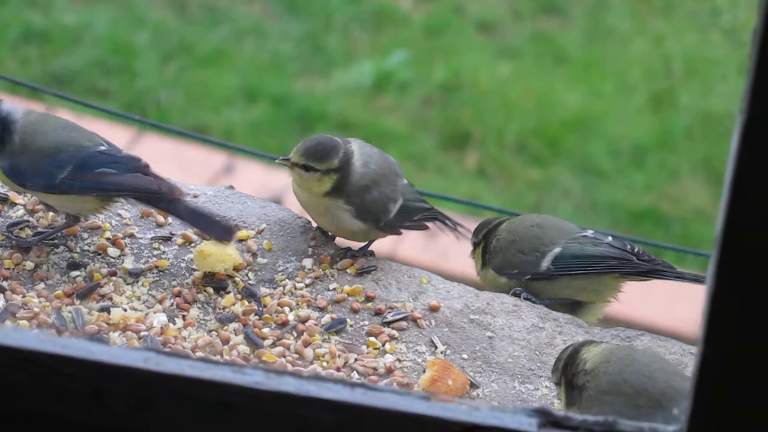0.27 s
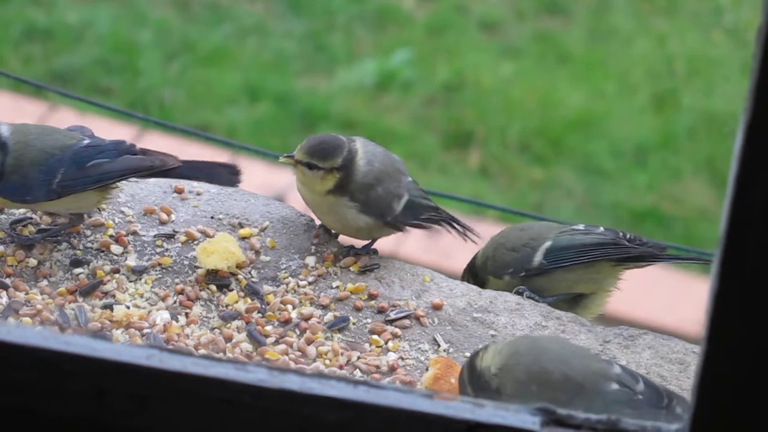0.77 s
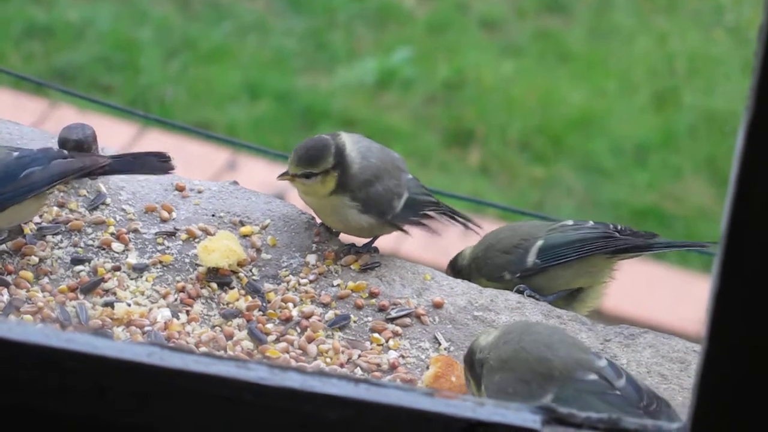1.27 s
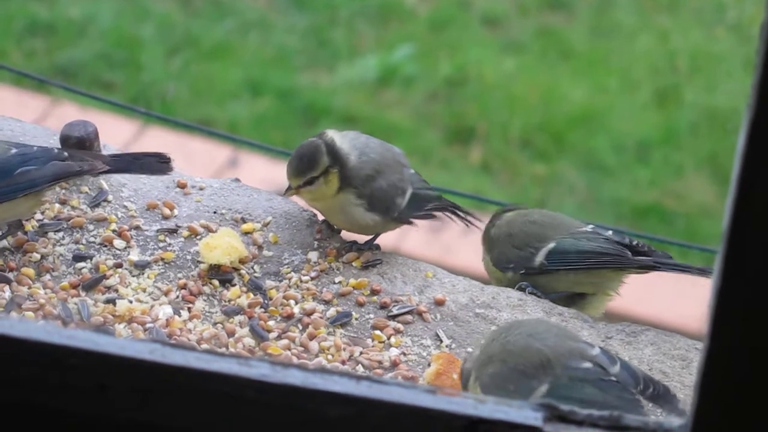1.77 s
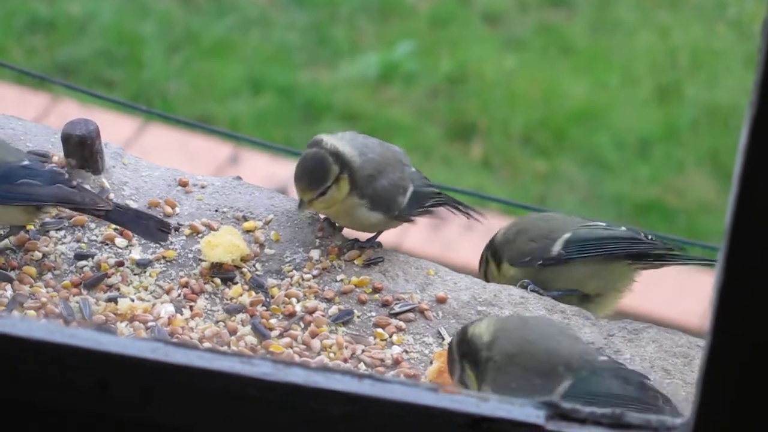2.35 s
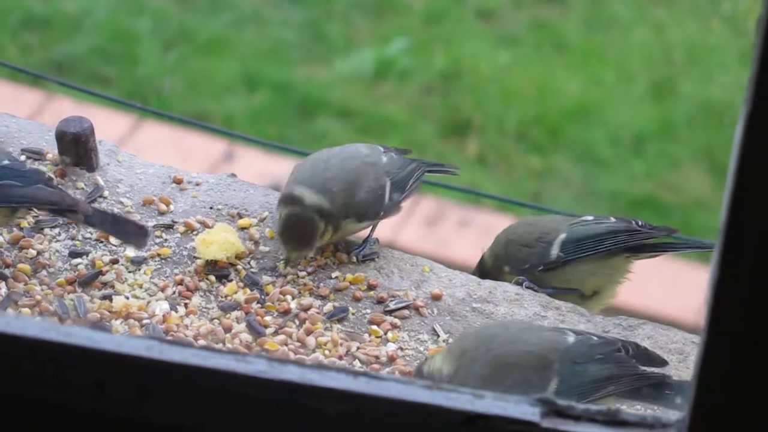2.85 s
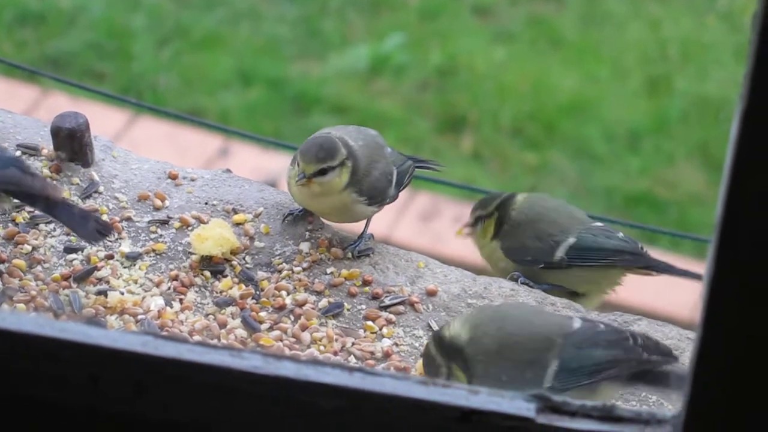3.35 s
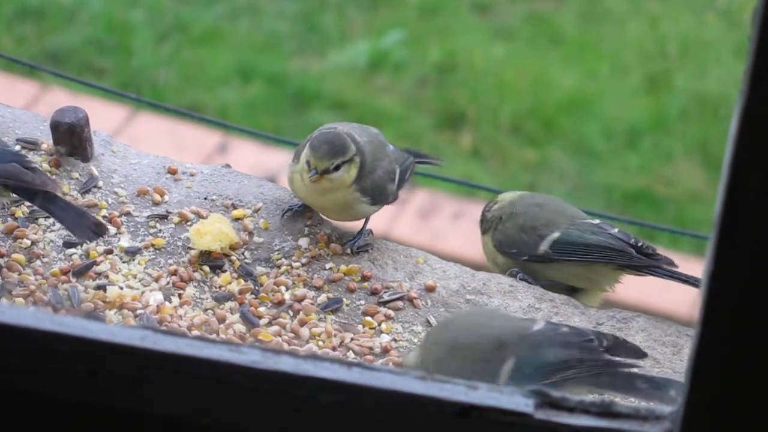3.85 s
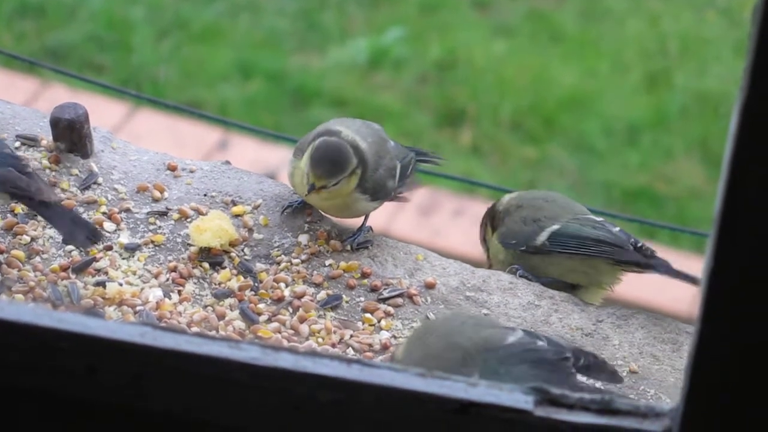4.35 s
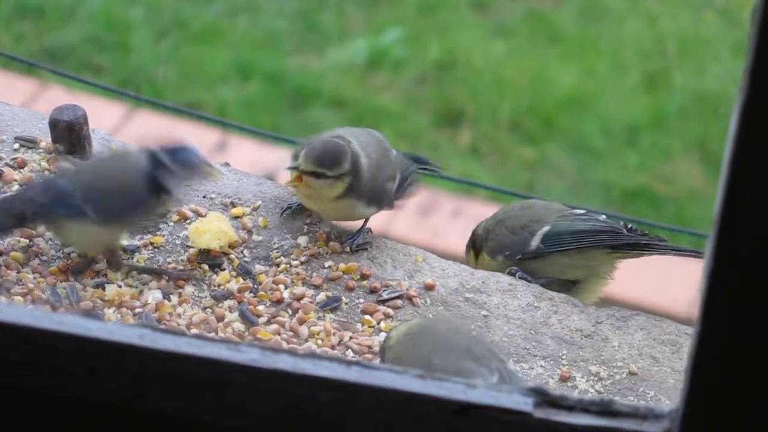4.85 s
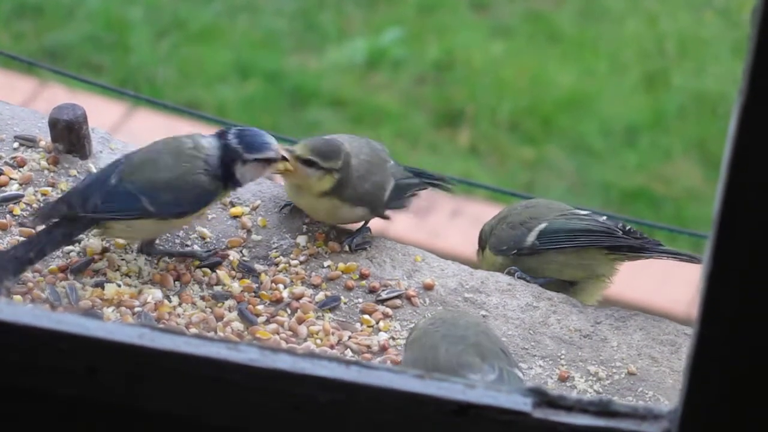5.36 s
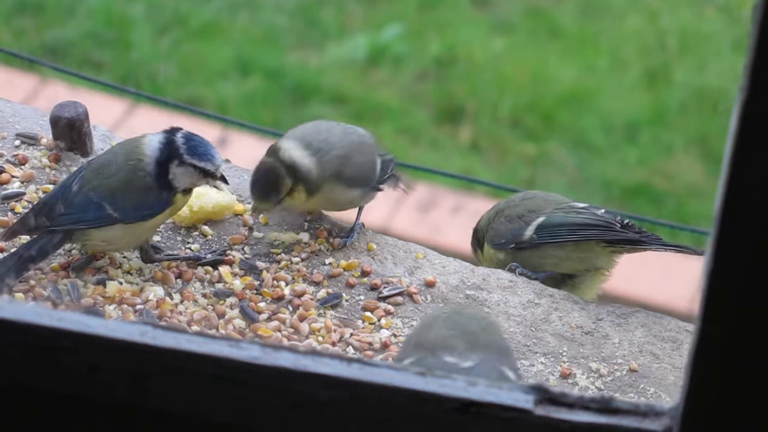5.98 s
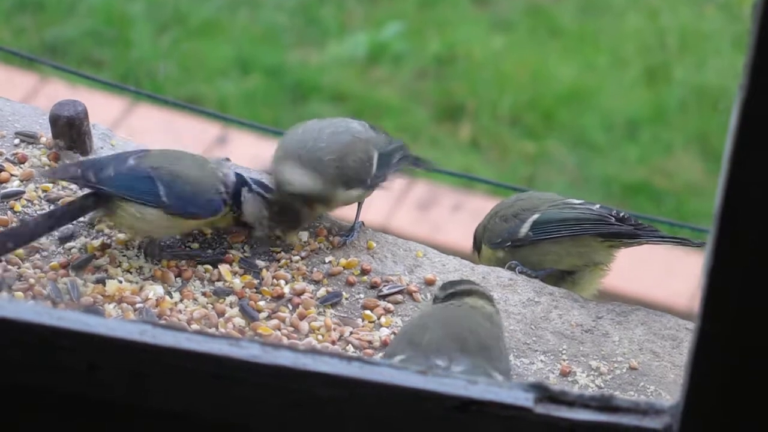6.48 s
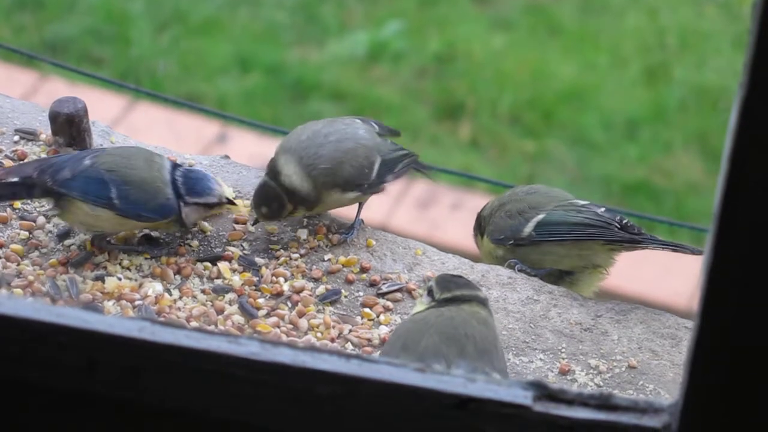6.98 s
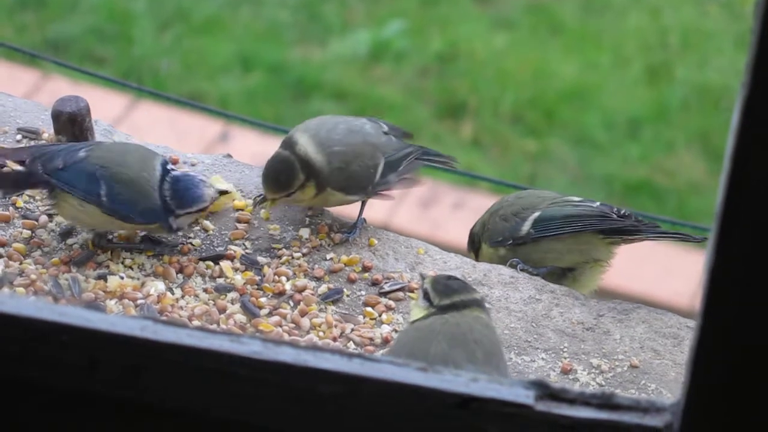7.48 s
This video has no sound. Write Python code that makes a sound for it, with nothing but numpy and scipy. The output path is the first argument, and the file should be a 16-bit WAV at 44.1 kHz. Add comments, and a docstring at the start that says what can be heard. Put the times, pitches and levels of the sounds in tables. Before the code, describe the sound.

Heard in stereo from just inside a window, young birds give rapid begging calls: rasping, climbing chirps around the middle treble and piercing peeps that sag in pitch. After the first clusters they nearly hush while a second bird sings a brief sweet whistle to the left. Louder mixed rasps and peeps follow to the end, lightly echoing off the recess, with a faint hush and barely audible low drone.

```python
"""Begging fledglings at a window

Blue tit fledglings beg at a window sill, heard from just inside: hoarse rasps come from two unsteady voices,
thin peeps start with a scratch and lock into a tone. Another small bird whistles one phrase of gliding notes.
Delayed copies and a fading noise tail echo the birds; filtered noise makes a faint outdoor hush and a low drone."""
import sys
import numpy as np
from scipy import signal
from scipy.fft import rfft, irfft, next_fast_len
from scipy.io import wavfile
from scipy.ndimage import map_coordinates

SR = 44100
rng = np.random.default_rng(int(sys.argv[2]) if len(sys.argv) > 2 else 0)


def generate_wav(signal):
    """Clip the signal to [-1, 1] and save it as 16-bit WAV at the path in sys.argv[1]."""
    frames = np.transpose(np.atleast_2d(signal))
    scaled = np.clip(frames, -1, 1) * 32767
    pcm = np.round(scaled).astype(np.int16)
    wavfile.write(sys.argv[1], SR, pcm)


N = 340893  # length of the scene in samples


def gain_of(db):
    """Turns decibels into amplitude."""
    return 10 ** (np.asarray(db) / 20)


def evened(x):
    """Scales a sound to an rms of 1."""
    return x / np.sqrt(np.mean(x ** 2) + 1e-20)


def read(points, hz):
    """Reads a table between its points, along a logarithmic frequency axis."""
    f, value = np.transpose(points)
    return np.interp(np.log(hz + 1), np.log(f + 1), value)


def add(mix, s, sound):
    """Adds a sound into the mix at time s in seconds, cutting off what lies outside."""
    start = round(s * SR)
    sound = sound[..., max(-start, 0):]
    part = mix[..., max(start, 0):][..., :sound.shape[-1]]
    part += sound[..., :part.shape[-1]]


def colour(x, db_at):
    """Filters a sound by a gain in dB given as a function of frequency."""
    size = next_fast_len(x.shape[-1] + 512)
    gains = gain_of(db_at(np.fft.rfftfreq(size, 1 / SR)))
    return irfft(rfft(x, size) * gains, size)[..., :x.shape[-1]]


def wander(t, hz):
    """Smooth random curve of rms 1 that takes hz new values a second."""
    return evened(map_coordinates(rng.standard_normal(1024), [t * hz], order=3, mode="wrap"))


def gate(t, length, rise, fall):
    """Opens and closes a sound softly; all times in seconds."""
    opening = np.sin(np.pi / 2 * np.clip(t / rise, 0, 1)) ** 2
    closing = np.sin(np.pi / 2 * np.clip((length - t) / fall, 0, 1)) ** 2
    return opening * closing


def panned(x, side_db):
    """Places a sound between left and right at constant power; positive side_db is left."""
    gains = gain_of(np.array([[side_db], [-side_db]]) / 2)
    return evened(gains) * x


def delayed(x, seconds):
    """Delays a sound by a fraction of a millisecond, by turning the phase of each frequency."""
    turn = np.exp(-2j * np.pi * np.fft.rfftfreq(2 * N, 1 / SR) * seconds)
    return irfft(rfft(x, 2 * N) * turn)[:N]


def hoarse(t, hz, rough, bright_db):
    """The two sides of the syrinx sing a small interval apart and pull on each other, splitting every harmonic."""
    # How the throat and open beak shape the voice.
    # Each row: frequency in Hz, gain in dB.
    throat = [(500, -34), (1100, -21), (1900, -14), (2700, -15), (3500, -8), (4100, -0.5), (4800, 6),
              (5500, 5), (6100, 1.5), (6900, 5.5), (7800, -6), (9500, -11.5), (11500, -22), (13000, -33.5),
              (15500, -41.5)]
    interval = 1.19  # pitch of the high side as a multiple of the low side

    def side_phase(side_hz):
        unsteady = 0.02454 * wander(t, 1502) + 0.021 * wander(t, 151.1)
        return 2 * np.pi * np.cumsum(side_hz * (1 + rough * unsteady)) / SR

    low, high = side_phase(hz), side_phase(interval * hz)
    pull = rough * np.sin(high - low)
    share = np.clip(2 * rough - .5, 0, 1)  # the high side is weaker in the cleaner calls
    stack = 0
    for k in range(1, 6):
        strength = 0.8 if k == 1 else 1
        stack = stack + strength * (np.cos(k * low + pull) + share * np.cos(k * high - pull))
    # strong and weak cycles alternate at times
    stack = stack * (1 + 0.37 * rough * wander(t, 199) * np.cos(low / 2))
    pressure = np.exp(rough * (0.5 * wander(t, 1400) + 0.16 * wander(t, 260)))
    breath = rough * rng.standard_normal(SR)[:len(t)]
    drive = pressure * (evened(stack) + breath)
    # bright_db tilts the sound by that many dB per octave
    return evened(colour(drive, lambda f: read(throat, f) + bright_db * np.log2(np.clip(f, 2200, 9000) / 5000)))


def rasp(length, level_db, top_hz, rough, bright_db):
    """A hoarse call that climbs to its top pitch; farther climbs are steeper, and the opening beak frees the voice."""
    onset_hz, onset_share = 1750, .42  # the pitch starts about this share of the way from onset_hz to the top
    crest = .82  # the top pitch comes after this share of the call
    push_s, droop_db_per_s = .052, 55  # effort peaks at push_s and droops on either side
    opening_s = 0.031
    t = np.arange(0, length + 0.01577, 1 / SR)
    climb_hz = (1 - onset_share) * abs(top_hz - onset_hz)
    hz = top_hz - climb_hz * (1 - t / t[-1] / crest) ** 2
    level = gain_of(level_db - droop_db_per_s * abs(t - push_s))
    voice = hoarse(t, hz, rough, bright_db)
    # a beak still partly shut lets mostly its own resonance through
    shut = evened(colour(voice, lambda f: -np.minimum(abs(f - 4750) / 180, 14)))
    opened = np.clip(t / opening_s, 0, 1)
    return level * gate(t, t[-1], rise=0.031, fall=0.031) * evened(opened * voice + (1 - opened) * shut)


def scratch(length, level_db, top_hz):
    """The rough start of a peep: a hoarse band that swells and climbs until the syrinx locks into a tone."""
    band_hz = 1100  # how fast the noise of the climbing band changes
    t = np.arange(0, length + 0.01304, 1 / SR)
    hz = np.interp(t, [0, .6 * length, t[-1]], [2050, 2300, .45 * top_hz])
    phase = 2 * np.pi * np.cumsum(2 * hz) / SR  # the noise band lies an octave above the hoarse pitch
    climbing = wander(t, band_hz) * np.cos(phase) + wander(t, band_hz) * np.sin(phase)
    bright_db = 10 * np.log2(top_hz / 7400)  # higher peeps start with a brighter scratch
    voice = climbing + gain_of(2) * hoarse(t, hz, rough=0.93, bright_db=bright_db)
    # thin out below the beak's resonance, by 5 dB per octave
    voice = colour(voice, lambda f: 5 * np.log2(np.clip(f, 500, 3500) / 3500))
    return gain_of(level_db) * gate(t, t[-1], rise=0.03, fall=0.019) * evened(voice)


def tone(lead, length, level_db, start_hz, end_hz, harmonic, upper_db):
    """A quick upward sweep, then a clear sagging tone: the throat picks one harmonic of a low stack."""
    sweep, release = .02, .007  # seconds
    muffle_hz, muffle_db_per_hz = 4800, .011  # the throat muffles whatever lies below this pitch
    t = np.arange(0, lead + length + release, 1 / SR)
    rising = np.clip((lead - t) / sweep, 0, 1)  # falls from 1 to 0 during the sweep
    held = np.maximum(t - lead, 0) / length  # grows from 0 to 1 during the tone
    hz = (start_hz + (end_hz - start_hz) * held ** 2) * (1 - .42 * rising ** 1.5)
    hz *= 1 + (.0025 + .045 * rising) * wander(t, 1100) + .002 * wander(t, 130)
    phase = 2 * np.pi * np.cumsum(hz / harmonic) / SR
    # the carrying harmonic, three neighbours and its octave: (steps up the stack, dB)
    partials = [(-1, -3 - 5.3 * harmonic), (0, 0), (1, upper_db), (2, upper_db - 110 / harmonic), (harmonic, -41)]
    voice = 0
    for step, db in partials:
        below_hz = np.maximum(muffle_hz - hz * (1 + step / harmonic), 0)
        voice = voice + gain_of(db - muffle_db_per_hz * below_hz) * np.cos((harmonic + step) * phase)
    quiver_db = 1.4 * wander(t, 140)
    effort_db = level_db - 13 * rising + 3.5 * (held - .5) + quiver_db
    opening = gate(t - lead + sweep, length + sweep + release, rise=.008, fall=.009)
    return np.sqrt(2) * gain_of(effort_db) * voice * opening


def peep(length, scratch_db, tone_db, start_hz, end_hz, harmonic, upper_db):
    """A scratch that locks into a tone; returns the sound and how many seconds before the lock it starts."""
    scratch_s, early = .03, .005  # the scratch starts this much earlier than the tone's lead-in
    out = np.zeros(SR // 4)
    add(out, 0, scratch(scratch_s, scratch_db, start_hz))
    add(out, early, tone(scratch_s, length, tone_db, start_hz, end_hz, harmonic, upper_db))
    return out, scratch_s + early


def fledglings():
    """Rasps and peeps from the sill; two microphones colour them differently and hear them at different times."""
    # Hoarse begging calls.
    # Each row: time in seconds, nominal length in seconds, level in dB at greatest effort, top pitch in Hz,
    # roughness from 0 clean to about 1 harsh, brightness in dB per octave.
    rasp_calls = [(.175, .075, -49.5, 1720, .45, -14), (.732, .06, -29.5, 2370, .65, -5),
                  (.846, .065, -30, 2700, .6, 0), (.99, .06, -39.5, 2300, .85, -7),
                  (1.143, .11, -31.5, 3030, .7, 0), (1.634, .07, -32, 2370, .55, -6.5),
                  (1.779, .075, -27, 2820, .65, -.5), (1.923, .09, -28, 2920, .75, 1.5),
                  (2.289, .065, -26.5, 2550, .7, 1), (2.408, .08, -26.5, 2940, .7, 2),
                  (2.569, .11, -26.5, 3080, .62, -3), (2.822, .06, -51, 2700, 1, -3),
                  (3.004, .07, -52.5, 1950, .6, -7), (3.127, .05, -45, 2210, .85, -6),
                  (3.685, .05, -25, 2600, .6, -3), (4.037, .11, -27.5, 2990, .65, -.5),
                  (4.334, .1, -51, 1870, .45, 3), (4.421, .075, -49.5, 1690, .5, -11),
                  (4.537, .075, -46.5, 2010, .7, -8), (4.725, .045, -22.5, 2850, 1, 3.5),
                  (5.181, .11, -25, 3130, .68, 4), (5.339, .11, -25.5, 3080, .68, -.5),
                  (6.029, .07, -45.5, 1850, .8, -18), (6.305, .045, -34.5, 2650, .72, -7),
                  (6.366, .075, -37.5, 1830, .5, -7), (6.454, .065, -32, 2000, 1, -3),
                  (6.825, .065, -26.5, 2830, .65, -.5), (6.966, .09, -27.5, 2850, .4, -1),
                  (7.085, .095, -28, 3000, .6, -4.5), (7.271, .08, -30, 2260, .5, -4),
                  (7.695, .06, -30, 2750, .8, 3)]
    # Thin peeps, with levels before a small common trim.
    # Each row: time in seconds at which the tone locks, tone length in seconds, scratch level in dB,
    # tone level in dB, pitch in Hz, sag in Hz, number of the harmonic that carries the tone,
    # level of the next harmonic up in dB relative to it.
    peep_calls = [(0, .035, -66, -51, 6800, 100, 3, -16), (.069, .052, -44, -31, 6970, 650, 3, -15),
                  (.306, .036, -46, -44.5, 7100, 50, 6, -6), (.436, .05, -48, -39, 7160, 400, 6, -7),
                  (1.01, .035, -35, -24, 6680, 0, 4, -19), (3.339, .015, -42, -42, 6690, 150, 5, -16),
                  (3.462, .05, -53, -41, 7090, 470, 6, -12), (3.805, .018, -27.5, -28.5, 7430, 400, 4, -11),
                  (3.919, .042, -29, -27.5, 7640, 650, 4, -12), (4.22, .05, -53, -49, 7040, 820, 6, -5),
                  (4.673, .014, -40.5, -41.5, 6680, 50, 4, -21),
                  (4.835, .038, -27.5, -27.5, 7620, 500, 4, -3),
                  (4.937, .063, -31, -26.5, 7630, 720, 4, -8), (5.069, .06, -35, -23.5, 7370, 680, 4, -12),
                  (5.545, .012, -45, -53, 5950, 100, 4, -18), (5.64, .03, -44, -41.5, 7060, 150, 5, -17),
                  (5.788, .037, -48, -40.5, 7180, 590, 5, -12), (6.363, .022, -30, -28, 6400, 320, 3, -27),
                  (6.449, .038, -31, -27.5, 7150, 650, 3, -15), (6.59, .014, -28.5, -30, 6200, 180, 3, -2),
                  (6.672, .043, -31.5, -27.5, 6810, 490, 3, -7),
                  (6.802, .058, -29.5, -32, 6440, 280, 3, -4), (6.957, .046, -33, -23.5, 7380, 660, 3, -18),
                  (7.413, .037, -28.5, -31.5, 6200, 200, 3, -1), (7.517, .06, -29, -28.5, 6520, 310, 3, -6),
                  (7.678, .046, -32, -26, 5270, 2070, 3, -9)]
    # How the two microphones colour the near birds.
    # Each row: frequency in Hz, left level minus right level in dB.
    side_colours = [(1500, 1), (2700, 0), (4200, 6.5), (5200, 8.5), (6400, -5.5), (8000, -11), (9800, -4.5),
                    (15000, -11)]
    voices = np.zeros(N)
    for s, *call in rasp_calls:
        add(voices, s - .008, rasp(*call))  # the soft opening starts a little ahead
    for s, length, scratch_db, tone_db, hz, sag_hz, *stack in peep_calls:
        sound, lead = peep(length, scratch_db, tone_db, hz, hz - sag_hz, *stack)
        add(voices, s - lead, gain_of(-0.3) * sound)
    left = colour(voices, lambda f: read(side_colours, f) / 2)
    right = colour(voices, lambda f: -read(side_colours, f) / 2)
    return np.array([delayed(left, 3.7e-5), right])  # they reach the right microphone first


def whistle(length, level_db, start_hz, end_hz, depth):
    """A near-pure note: a trill glides evenly and throbs in pitch and level; a plain note slurs to its end pitch."""
    trill_hz, throb_db = 46, 40  # trill rate; level swing for a trill depth of 1
    best_hz, fade_db_per_hz = 4750, .0105  # the whistler is loudest at this pitch and fades away from it
    slur_share = .7  # a plain note reaches its end pitch after this share of its length
    t = np.arange(0, length, 1 / SR)
    if depth > 0:
        glide = t / length
    else:
        glide = np.sin(np.pi / 2 * np.minimum(t / length / slur_share, 1)) ** 1.2
    hz = start_hz + (end_hz - start_hz) * glide
    trill = depth * np.sin(2 * np.pi * trill_hz * t)
    phase = 2 * np.pi * np.cumsum(hz * (1 + trill + 0.018 * wander(t, 704))) / SR
    effort_db = level_db - fade_db_per_hz * abs(hz - best_hz) + throb_db * trill + 2.2 * wander(t, 252)
    arch_db = -7 * (2 * t / length - 1) ** 2  # weaker at the ends than in the middle
    return np.sqrt(2) * gain_of(effort_db + arch_db) * np.sin(phase) * gate(t, t[-1], rise=0.0029, fall=0.0062)


def whistler():
    """Another small bird sings one phrase off to the left."""
    # Notes of the whistled phrase.
    # Each row: start in seconds, length in seconds, level in dB at the best pitch, start pitch in Hz,
    # end pitch in Hz, trill depth as a share of the pitch.
    phrase = [(2.9, .105, -33, 3650, 3400, .045), (3.062, .122, -30.5, 3750, 5400, .04),
              (3.184, .055, -29, 5630, 3420, 0), (3.28, .062, -30, 3400, 4960, 0),
              (3.375, .055, -30, 3350, 4820, 0), (3.49, .054, -32, 3300, 4900, 0)]
    song = np.zeros(N)
    for s, *note in phrase:
        add(song, s, whistle(*note))
    return panned(song, side_db=9.5)


def window(x, room_db=-14):
    """Near echoes from the window recess, then the room's tail of scattered echoes fading at its own rate per pitch."""
    # Echoes from the sill and window frame.
    # Each row: delay at the left in seconds, delay at the right in seconds, level in dB.
    recess = [(.0009, .0013, -39), (.0031, .0024, -15.5), (.0058, 0.0039, -7), (0.0137, 0.017, -12),
              (.021, .0225, -15.5)]
    # How long the room behind the window rings.
    # Each row: frequency in Hz, time to fade by 60 dB in seconds.
    room_fade = [(1000, 1), (4000, 0.43), (7000, 0.33), (10000, 0.39), (15000, 0.094)]
    out = x.copy()
    for left_s, right_s, db in recess:
        add(out[0], left_s, gain_of(db) * x[0])
        add(out[1], right_s, gain_of(db) * x[1])
    # about 2500 random echoes a second, after a short gap
    chosen = rng.random((2, SR)) < 2500 / SR
    taps = rng.standard_normal((2, SR)) * chosen * (np.arange(SR) > 0.0037 * SR)
    hz, t, z = signal.stft(taps, SR, nperseg=256)
    fade = gain_of(-60 * t / read(room_fade, hz)[:, None])
    tail = signal.istft(z * fade, SR, nperseg=256)[1]
    tail /= np.linalg.norm(tail[0])
    into_room = 1.32 * x + 0.16 * x[::-1]  # each side leaks a little into the other
    return out + gain_of(room_db) * signal.fftconvolve(into_room, tail, axes=1)[:, :N]


def hush():
    """Distant outdoor air: filtered noise, more alike on the two sides in the bass than in the low treble."""
    # Colour of the outdoor hush.
    # Each row: frequency in Hz, relative level in dB.
    air_colour = [(15, -20), (30, -2), (65, -3), (100, 0), (130, -4), (280, -5), (500, -7), (900, -9),
                  (1800, -13), (4200, -12), (7000, -18), (11000, -22), (15500, -26)]
    # How alike the hush is in the two channels.
    # Each row: frequency in Hz, likeness from 0 to 1.
    likeness = [(30, 0.71), (120, 0.64), (400, 0.2), (1500, 0.36), (6000, 0.52), (15000, .1)]
    a, b = rfft(rng.standard_normal((2, N)))
    same = np.clip(read(likeness, np.fft.rfftfreq(N, 1 / SR)), 0, 1)
    noise = irfft([a, same * a + np.sqrt(1 - same ** 2) * b], N)
    air = colour(noise, lambda f: read(air_colour, f))
    swell_db = 0.67 * wander(np.arange(N) / SR, 5.5)
    return gain_of(-57 + swell_db) * evened(air)


def drone():
    """A faint low drone: a narrow band of noise that swells and fades."""
    hz, width_hz, level_db = 228, 22, -73
    band = colour(rng.standard_normal((2, N)), lambda f: -20 * np.log10(1 + ((f - hz) / width_hz) ** 2))
    swell_db = 2.2 * wander(np.arange(N) / SR, 3)
    return gain_of(level_db + swell_db) * evened(band + .25 * band[::-1])


def scene():
    """All the birds through the window, the whistler with more room echo, over the hush and the drone."""
    return window(fledglings()) + window(whistler(), room_db=-11.5) + hush() + drone()


def record(dry):
    """Softens both ends, then cuts the highest treble with a steep low-pass filter."""
    edge_hz = 15750
    ends = gate(np.arange(N) / SR, N / SR, rise=.003, fall=.006)
    low_pass = signal.firwin(511, edge_hz, window=("kaiser", 9), fs=SR)
    return signal.oaconvolve(dry * ends, low_pass[None], "same")


dry = scene()
out = record(dry)
generate_wav(out)
```